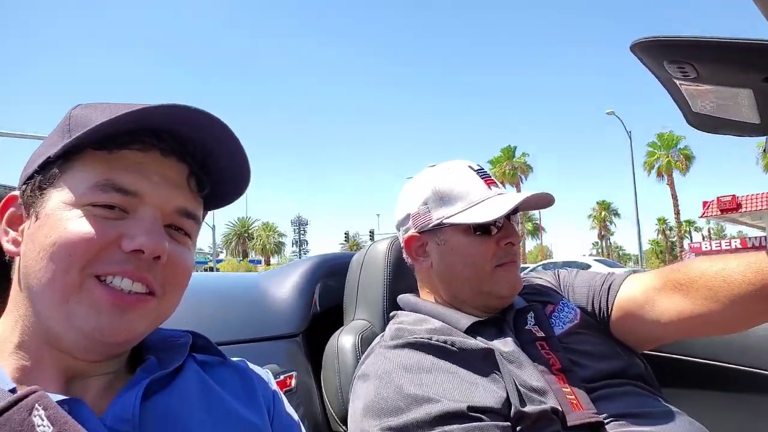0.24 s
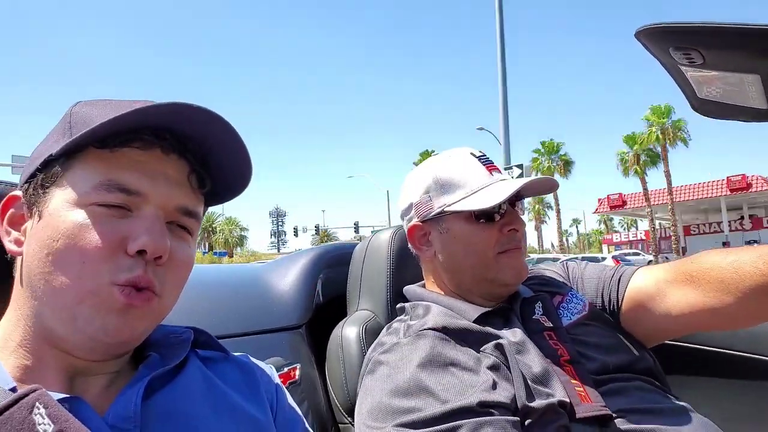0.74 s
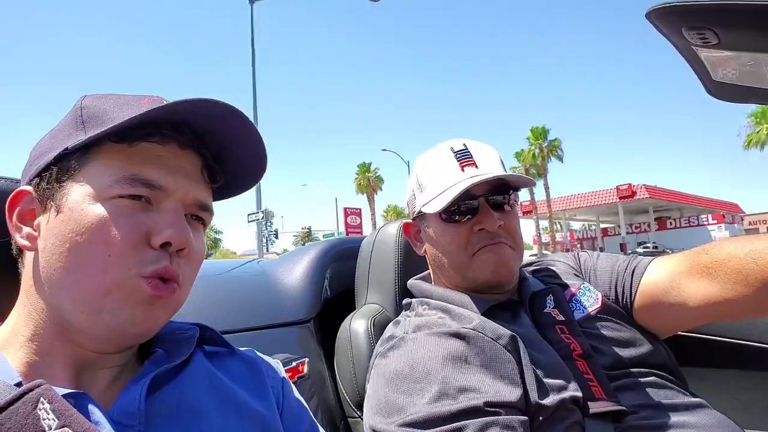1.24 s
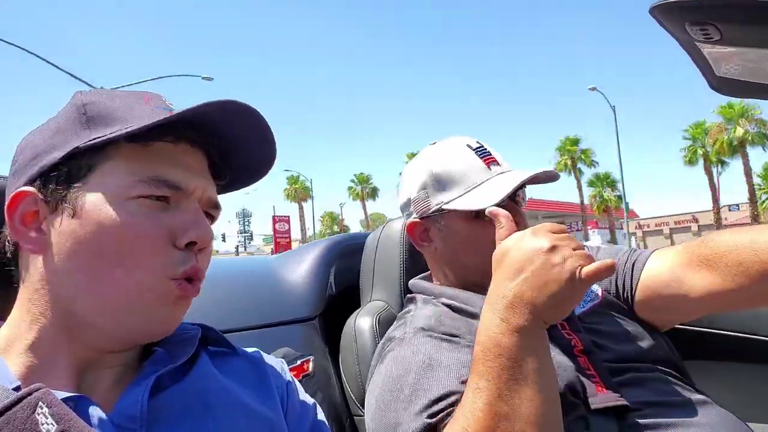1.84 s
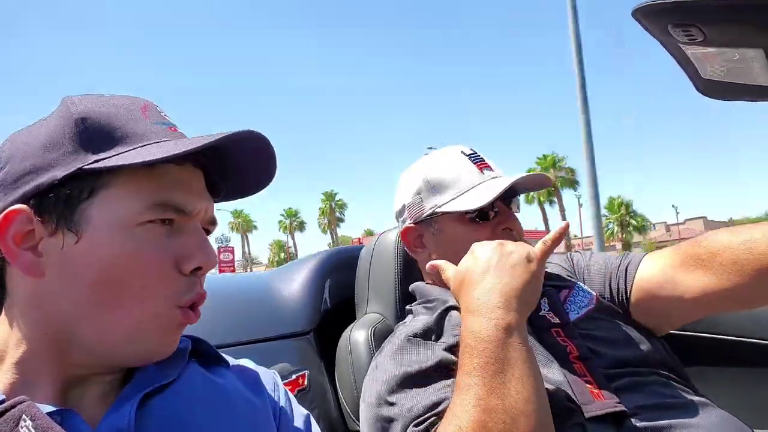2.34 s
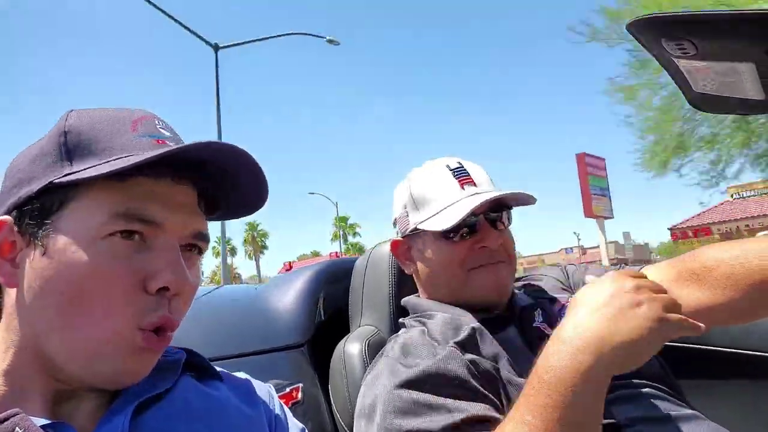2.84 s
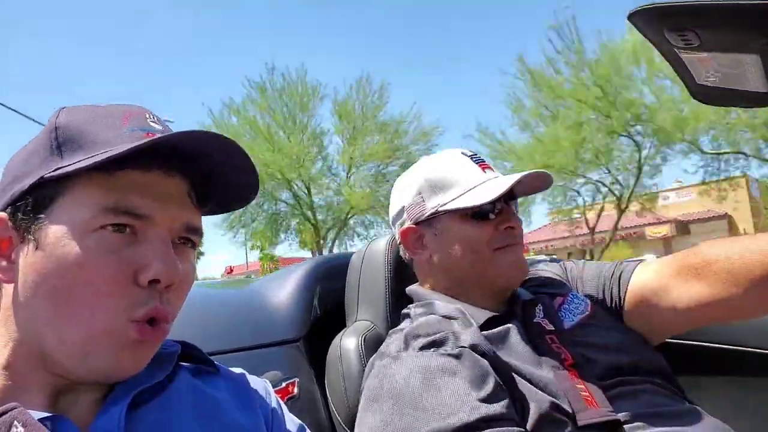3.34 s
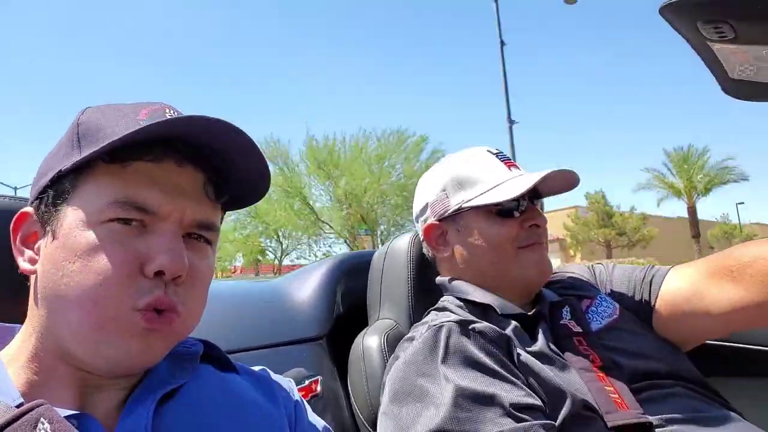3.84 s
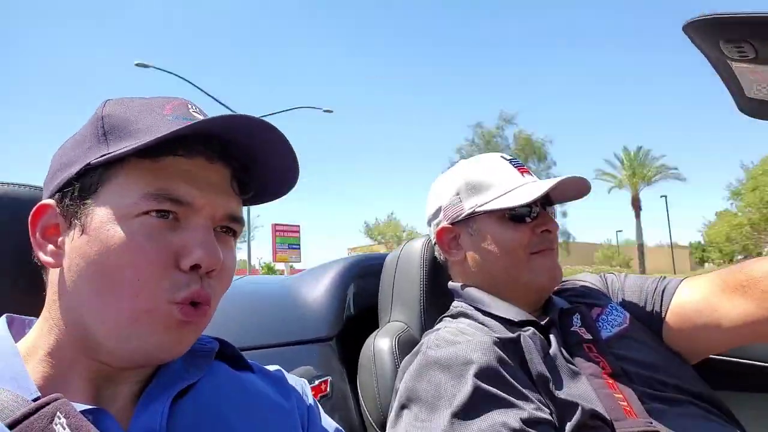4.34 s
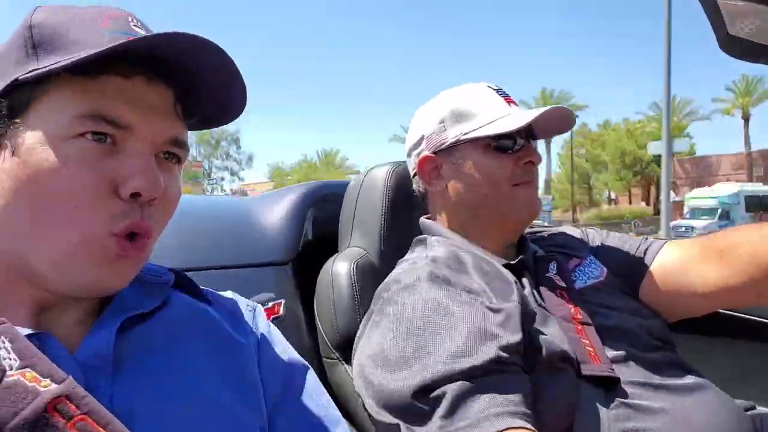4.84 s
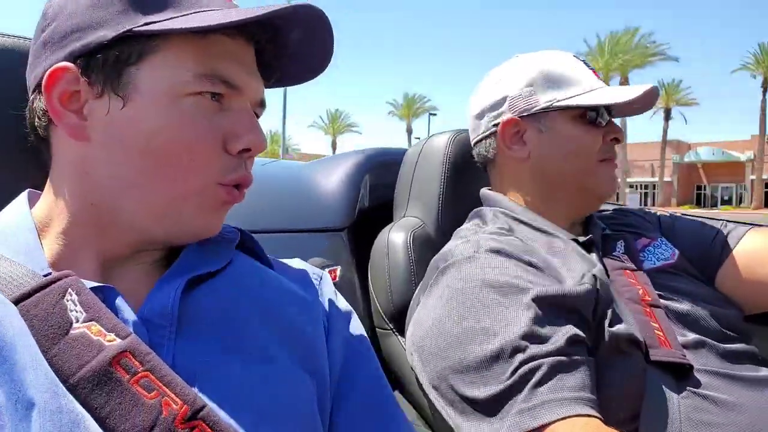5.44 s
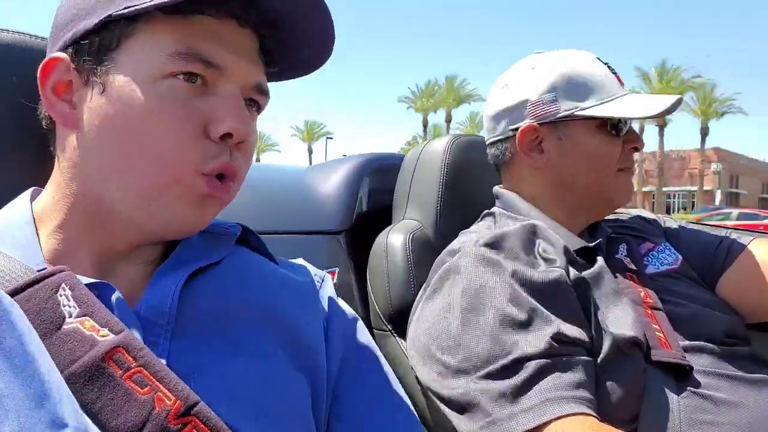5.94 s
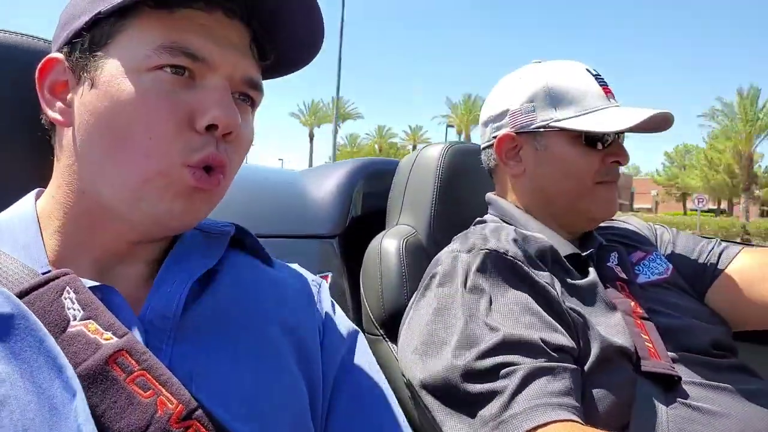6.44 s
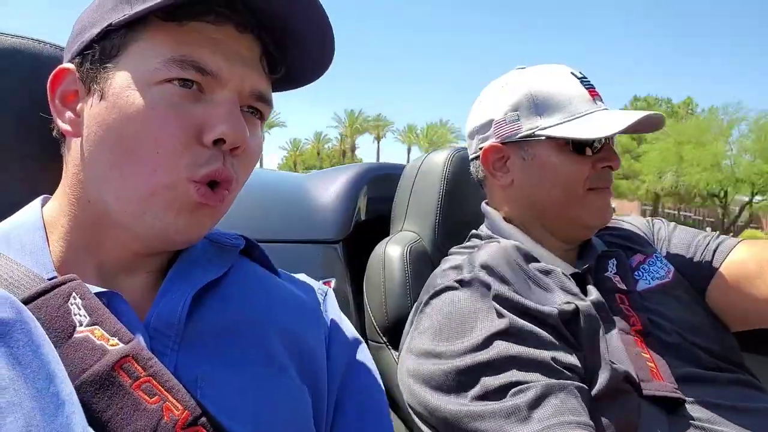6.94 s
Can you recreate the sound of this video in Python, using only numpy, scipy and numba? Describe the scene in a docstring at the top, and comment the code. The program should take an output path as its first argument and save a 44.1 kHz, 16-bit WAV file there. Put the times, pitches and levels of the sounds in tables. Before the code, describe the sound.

Close stereo sound from the cabin of an open convertible. From 0 s a V8 exhaust hums and growls at moderate revs, with road rumble and rushing air; wind gusts thud against the left microphone, busiest from 0.3 to 1.4 s. The pitch climbs smoothly in one gear, and from about 2.5 s the boom and raspy snarl grow much stronger, peaking around 3 to 4.2 s with a brief swell of hiss near 3.65 s. Deep thumps land near 2.9, 3.8 and 4.3 s. At 4.25 s the throttle shuts: the rasp drops, a burble dies away and pitch falls until about 5.7 s. Hard slaps and cracks cluster at 4.3-4.5 and 5-5.25 s. Then the left abruptly turns thin, with puffs, crackles and splutter growing toward 7 s. The right keeps a soft coasting hum, which sinks at the end; hollow knocks fall around 5.5-6.4 s.

```python
"""The exhaust of a V8 convertible sings on every half order of its crankshaft and snarls as it pulls in one gear.
The driver lifts off near the end of the pull and the car coasts, with a dying burble and then a soft hum.
With the roof down, air rushes over the cabin as coloured noise, under a few hollow knocks and deep thumps.
Wind buffets and slaps the left microphone, whose sound turns thin and spluttery near the end.
The right one hears the same wind only faintly."""
import sys
import numpy as np
from scipy import signal
from scipy.fft import rfft, irfft, next_fast_len
from scipy.io import wavfile
from numba import njit

SR = 44100
rng = np.random.default_rng(int(sys.argv[2]) if len(sys.argv) > 2 else 0)


def to_wav(sig):
    """Store sig (one row per channel, or 1-D mono) as 16-bit WAV at the path in sys.argv[1].

    Samples outside -1..1 are clipped; the rate is SR.
    """
    pcm = np.clip(np.atleast_2d(sig), -1, 1) * 32767
    pcm = np.round(pcm).astype(np.int16)
    wavfile.write(sys.argv[1], SR, pcm.T)  # frames by channels


N = 317386

# crankshaft speed through the pull and the coasting: (time [s], speed [turns/s])
CRANK_SPEED = [(0.0, 47.2), (0.8, 56.1), (1.2, 61), (1.6, 66.6), (2.0, 71.6), (2.4, 76.7), (2.7, 80.85),
               (2.9, 83), (3.15, 85.1), (3.35, 88.3), (3.6, 91.25), (3.9, 94.2), (4.1, 96.1), (4.3, 97.5),
               (4.42, 92), (4.6, 93), (5.0, 79), (5.3, 67.5), (5.6, 60), (5.8, 58.5), (6.5, 58), (6.75, 57),
               (7.2, 50.3)]
# engine load: (time [s], relative boom of the low orders [dB], relative roar [dB])
ENGINE_LOAD = [(0.0, -34, -45), (0.7, -34, -45.5), (1.3, -32.5, -43.5), (1.8, -28, -37), (2.3, -28, -36.5),
               (2.55, -23.5, -33), (2.95, -21, -27.5), (3.2, -22, -29), (3.72, -20.5, -26),
               (3.88, -26, -29.5), (4.2, -26, -26), (4.45, -33, -33.5), (5.2, -41, -35), (5.6, -42.5, -32),
               (6.7, -42, -52), (7.2, -49, -59)]
# resonances of pipes and cabin on the way to each ear: (frequency [Hz], left gain [dB], right gain [dB])
PATH_TO_EARS = [(48.0, 1.0, -1.0), (75.0, 3.0, 1.5), (111.0, 7.5, 3.0), (133.0, -1.0, 0.5),
                (154.0, 5.0, 7.0), (175.0, -1.0, 1.0), (200.0, 0.5, -0.5), (227.0, -0.5, -2.0),
                (250.0, -8.5, -4.0), (275.0, -8.0, -9.5), (312.0, -7.0, -15.5), (340.0, -2.0, -9.0),
                (375.0, -3.5, -12.5), (414.0, -8.5, -8.0), (450.0, -2.5, -9.5), (490.0, 0.5, -2.0),
                (530.0, -8.0, -6.5), (580.0, -3.5, -9.0), (630.0, -5.0, -14.0), (690.0, -3.0, -7.5),
                (740.0, -1.0, -5.5), (780.0, 3.5, -5.5), (830.0, 2.0, -9.0), (880.0, -1.5, -10.5),
                (940.0, -1.0, -11.0), (1000.0, -1.0, -8.5), (1060.0, -2.0, -15.5), (1110.0, -8.5, -15.0),
                (1170.0, -2.0, -9.5), (1230.0, -1.5, -11.0), (1300.0, -2.0, -12.0), (1370.0, -3.0, -8.5),
                (1450.0, -6.5, -13.5), (1550.0, -5.0, -20.0), (1680.0, -3.5, -18.0), (1800.0, -9.5, -20.5)]
# road and air noise in the cabin: (time [s], relative rumble [dB], relative rush [dB], relative hiss [dB])
CABIN_AIR = [(0.0, -26, -44.5, -82), (0.7, -33.5, -39.5, -63), (1.25, -37, -44, -78),
             (1.85, -30, -36, -62.5), (4.4, -23.5, -36, -57.5), (5.6, -30, -37.5, -58),
             (6.3, -32, -31.5, -58.5), (6.9, -23.5, -29, -54.5), (7.2, -20, -26, -53)]
# spectrum of the wind's crackles, rustle and fine hiss: (frequency [Hz], relative level [dB])
CRACKLE_SPECTRUM = [(200, -25), (600, 10), (1100, 10), (2000, -1), (3200, -8.5), (5000, -22), (8000, -39),
                    (14000, -37)]
# spectrum of the wind's hollow puffs: (frequency [Hz], relative level [dB])
PUFF_SPECTRUM = [(150, -48), (300, 9), (450, 9.5), (700, -2.5), (1100, -5), (2000, -23.5), (3200, -23.5),
                 (5000, -35.5), (8000, -43), (14000, -41)]

LEFT_LEAD_S = 0.0003  # sound shared by both sides reaches the left first
FIRINGS_PER_TURN = 4
LIFT_OFF_S, CLOSING_S = 4.25, 0.065  # the throttle shuts once
THIN_S, THINNING_S = 5.245, 0.017  # the left side suddenly turns thin


def exhaust(speed, turns, low_rough=0.06, high_rough=0.3, boom_hz=220, rasp_hz=600, uneven_db=1.25):
    """The firing pattern repeats every two turns, so lines stand on half orders; the high ones flutter more."""
    # uneven firing of the two banks:
    # (multiple of crank speed, relative level at low revs [dB], relative level at high revs [dB])
    firing_orders = [(1.0, 12.5, 0.5), (1.5, 2.5, -0.5), (2.0, 1.5, 3.5), (2.5, -1.0, 6.5), (3.0, 5.5, 2.0),
                     (3.5, 6.0, 5.0), (4.0, 19.0, 8.0), (4.5, -3.0, -2.0), (5.0, 5.0, 5.0),
                     (5.5, 2.0, -5.0), (6.0, -2.0, 4.5), (6.5, 2.0, -0.5), (7.0, 4.0, -3.0),
                     (7.5, 0.5, -3.5), (8.0, 9.0, 3.0)]
    # the singing upper orders: (multiple of crank speed, relative level [dB])
    upper_orders = [(8.5, 3.0), (9.0, -0.5), (9.5, -1.0), (10.0, 3.5), (10.5, 2.0), (11.0, 1.5),
                    (11.5, -0.5), (12.0, 1.0), (12.5, -5.5), (13.0, -5.5), (13.5, -3.5), (14.0, 0.0),
                    (14.5, 1.0), (15.0, -3.5), (15.5, 0.0), (16.0, 0.0), (16.5, -1.5), (17.0, -4.5),
                    (17.5, -2.0), (18.0, -4.5), (18.5, -3.5), (19.0, -5.0), (19.5, -4.5), (20.0, -4.5),
                    (20.5, -5.5), (21.0, -7.5)]
    low_revs, high_revs = 55, 87.4  # turns per s

    out = np.zeros((2, N))
    coarse = np.arange(0, N, 64)  # levels move slowly enough for every 64th sample
    boom_db = in_time(ENGINE_LOAD)[0][coarse]
    rasp_db = rasp_level()[coarse]
    revved = np.clip((speed[coarse] - low_revs) / (high_revs - low_revs), 0, 1)
    orders = [(multiple, slow_db + revved * (fast_db - slow_db))
              for multiple, slow_db, fast_db in firing_orders]
    stroke_db = uneven_db * drift(40)[coarse]  # the boom varies quickly in strength

    for multiple, own_db in orders + list(upper_orders):
        hz = multiple * speed[coarse]
        high = np.clip(np.log(hz / boom_hz) / np.log(rasp_hz / boom_hz), 0, 1)
        level_db = own_db + (1 - high) * (boom_db + stroke_db) + high * rasp_db
        rough = low_rough + (high_rough - low_rough) * high.mean()
        swell = 1 + rough * drift(9.0)
        # the lowest orders add up to one beat a cycle; the pipes scatter the others
        scatter = rng.random() * (multiple > 2.5)
        phase = 2 * np.pi * (multiple * turns + scatter) + rough * drift(0.97)
        for side in range(2):
            path_db = at_hz(PATH_TO_EARS, hz, channels=side + 1)
            gain = np.interp(np.arange(N), coarse, from_db(level_db + path_db))
            lag = 2 * np.pi * multiple * speed * LEFT_LEAD_S * side
            out[side] += gain * swell * np.sin(lag - phase)
    return out


def rasp_level(offset_db=-3.5, revs_db=-0.1863, pivot=82.8, shut_loss_db=21):
    """High orders in dB: they follow the roar, ease down as the revs rise, and drop as the throttle shuts."""
    easing_db = revs_db * (in_time(CRANK_SPEED)[0] - pivot)  # dB per turn/s, about a pivot in turns/s
    roar_db = in_time(ENGINE_LOAD)[1]
    return roar_db + offset_db + easing_db - shut_loss_db * ramp(LIFT_OFF_S, CLOSING_S)


def snarl(turns, level_db=-5.5, right_db=-12.5, firing=0.62, flutter_db=2.5, count=420, size=8192):
    """Gas tears through the valves in one ragged pattern every cycle: a dense comb of high lines."""
    # spectrum of the valve snarl: (frequency [Hz], relative level [dB])
    snarl_spectrum = [(1000, -18.5), (1400, 2), (1800, 4), (2600, -8), (3300, -13), (4800, -26.5),
                      (5600, -30.5), (6150, -33.5), (7200, -27), (9500, -59), (12500, -25.5),
                      (14500, -32.5)]
    cycle = irfft(rng.standard_normal(count) + 1j * rng.standard_normal(count), size)
    ragged = np.interp(turns / 2, np.arange(size) / size, cycle, period=1)
    throb = 1 + firing * np.cos(2 * np.pi * FIRINGS_PER_TURN * turns)
    level = from_db(rasp_level() + level_db + flutter_db * drift(8.1))
    return from_db([[0], [right_db]]) * level * colour(ragged * throb, snarl_spectrum)


def drone(speed, turns, rough=0.19, hum_order=3, hum_db=-24.5, burble_order=1.5, burble_db=-11.5):
    """With the throttle shut a burble dies away; later a soft order swells as it sinks into a cabin resonance."""
    coasting_s = np.maximum(np.arange(N) / SR - LIFT_OFF_S, 0)
    resonance_db = at_hz(PATH_TO_EARS, hum_order * speed, channels=2)
    hum = ramp(5.69, 1) * from_db(hum_db + resonance_db)
    fading = from_db(burble_db - 30 * coasting_s)  # fades at 30 dB per s
    burble = ramp(LIFT_OFF_S + CLOSING_S, CLOSING_S) * fading
    out = 0
    for multiple, gain in [(hum_order, hum), (burble_order, burble)]:
        swell = 1 + rough * drift(3.1)
        out = out + gain * swell * np.sin(2 * np.pi * multiple * turns + rough * drift(4.0))
    return out


def buffeting(lumpy_db=5.0, spiky_db=7.5, breeze_db=-25.5):
    """Turbulence comes in lumps, each made of sudden pressure steps."""
    # spectrum of the eddies: (frequency [Hz], relative level [dB])
    eddy_spectrum = [(20, -41), (35, -18), (60, 5), (120, -3), (250, -8), (500, -15.5), (1000, -29.5),
                     (2000, -42), (4000, -73), (8000, -84)]
    uneven_db = lumpy_db * np.tanh(drift(13)) + spiky_db * np.clip(drift(640), -2, 2)
    steps = rng.standard_normal(N) * from_db(uneven_db)
    return (from_db(breeze_db) + gust_strength()) * colour(steps, eddy_spectrum)


def gust_strength(attack_s=0.013, release_s=0.023):
    """Each gust on the left microphone rises, holds and dies away."""
    # gusts: (start [s], length [s], level [dB])
    gust_rows = [(0.33, 0.22, -13.5), (0.541, 0.26, -12), (1.297, 0.17, -14.5), (2.145, 0.033, -8),
                 (3.223, 0.055, -15), (3.757, 0.094, -10.5), (4.27, 0.22, -15), (4.808, 0.032, -15.5),
                 (5.019, 0.202, -10.5), (5.465, 0.37, -38), (6.92, 0.5, -27.5)]
    out = 0
    for start_s, length_s, db in gust_rows:
        rise = ramp(start_s, attack_s)
        out = out + from_db(db) * (rise - rise * ramp(start_s + length_s, release_s))
    return out


def slaps(thud_db=-5.5, spike_db=2.0, recoil_db=0.0, crack_db=0.5, crack_s=0.0021, rise_s=0.0019,
          thud_s=0.0044, lead_s=0.002026, spike_s=0.0005, count=500):
    """An eddy hits the microphone port: a spike of pressure and a short crack, with suction and a dull thud."""
    # the largest eddies on the left microphone: (time [s], relative peak [dB], relative crack [dB])
    large_slaps = [(0.034, -9, -48), (0.168, -9.5, -25), (0.345, -8, -29), (0.375, -8, -24),
                   (0.568, -8, -30), (0.643, -3, -32), (0.674, -13, -29), (0.718, -16, -39),
                   (0.734, -6.5, -42), (0.745, -10, -37), (0.788, -5.5, -15), (0.805, -13, -39),
                   (0.951, -15, -44), (1.006, -13, -47), (1.169, -6.5, -20), (1.178, -5, -15),
                   (1.219, -9, -11.5), (1.255, -13, -46), (1.299, -8, -43), (1.325, -18, -36),
                   (1.346, -8.5, -41), (1.373, -19, -36), (1.611, -2, -18), (3.069, 0, -17),
                   (3.3295, -1, -15), (3.858, 0.5, -37), (3.9097, -3, -32), (3.927, -4.5, -25),
                   (4.194, -9, -32), (4.302, -3, -26), (4.307, -13, -29), (4.36, -10, -32), (4.368, -2, -3),
                   (4.377, -0.5, -30), (4.383, -1, -18), (4.401, -13, -19), (4.409, -7, -11),
                   (4.428, -19, -32), (4.48, -8, -24), (4.823, -9, -28), (5.0198, -3.5, -24),
                   (5.023, -13, -28), (5.035, -14, -30), (5.045, -11, -31), (5.056, 0, -13),
                   (5.075, -8, -10.5), (5.083, -7, -32), (5.121, -13, -33), (5.1294, -2.5, -10.5),
                   (5.1372, -2, -3.5), (5.144, -10, -12), (5.186, -13, -27), (5.197, -15, -30),
                   (5.2318, 0.5, -14), (5.251, -12, -20)]
    # what a slap rings with: (frequency before a random stretch [Hz], relative level [dB], decay [s])
    port_rings = [(111, -0.5, 0.004), (330, -11, 0.002), (650, -18, 0.00088), (1020, -18, 0.0012)]
    # spectrum of the thud: (frequency [Hz], relative level [dB])
    thud_spectrum = [(40, 6), (90, 5.5), (300, 4), (600, 3), (1100, -11.5), (2000, -30.5), (5000, -90.5)]
    # spectrum of the crack: (frequency [Hz], relative level [dB])
    crack_spectrum = [(300, -4.5), (1100, 4), (2500, -10.5), (5000, -27.5), (8000, -44), (10000, -49),
                      (14000, -68)]

    out, thud, crack = np.zeros(N), noise(thud_spectrum), noise(crack_spectrum)
    stretches = np.exp(rng.normal(0, 0.11, count))
    for (s, peak_db, bright_db), stretch in zip(list(large_slaps) + small_slaps(), stretches):
        at = np.arange(int(s * SR), min(int((s + .06) * SR), N))
        t = (at - at[0]) / SR
        after = np.maximum(t - lead_s, 0)  # the spike starts a little after the thud
        body = thud[at] * (1 - np.exp(-t / rise_s)) * np.exp(-t / thud_s)
        body = 2 * body / (np.abs(body).max() + 1e-20)
        spike = (after / spike_s * np.exp(1 - after / spike_s)) ** 3  # reaches its top after spike_s
        recoil = np.zeros(len(t))
        for k, (hz, db, decay) in enumerate(port_rings):
            ring = np.sin(2 * np.pi * hz * stretch * after) * np.exp(-after / decay)
            recoil += (-1) ** (k + 1) * from_db(db) * ring
        pressure = from_db(thud_db) * body + from_db(spike_db) * spike + from_db(recoil_db) * recoil
        out[at] += from_db(peak_db) * pressure
        crack_shape = np.minimum(t / lead_s, 1) ** 2 * np.exp(-after / crack_s)
        out[at] += from_db(bright_db + crack_db) * crack[at] * crack_shape
    return signal.sosfilt(signal.butter(2, 5500, fs=SR, output="sos"), out)


def small_slaps(per_s=26, peak_db=-10, crack_db=-26, spread_db=3.0, count=400):
    """Smaller slaps inside the gusts, unevenly spaced, at a random level relative to the gust."""
    draws, gust = rng.random((count, 2)), gust_strength()
    times = np.cumsum(.5 + draws[:, 0]) / per_s
    rows = []
    for s, size in zip(times, 2 * draws[:, 1] - 1):
        if s * SR < N and gust[int(s * SR)] > 0:
            db = 20 * np.log10(gust[int(s * SR)]) + spread_db * size
            rows.append((s, db + peak_db, db + crack_db))
    return rows


def sputters(puff_db=-0.5, crackle_db=5.0, puff_s=0.007, crackle_s=0.0019):
    """Each larger eddy on the thin left side is a hollow puff with a shorter crackle at its height."""
    # sputters: (time [s], relative puff [dB], relative crackle [dB])
    sputter_rows = [(5.281, -26, -24), (5.329, -24, -29), (5.378, -24, -31), (5.402, -21, -31),
                    (5.43, -26, -30), (5.48, -24, -29), (5.505, -24, -30), (5.522, -24, -28),
                    (5.569, -24, -34), (5.662, -22, -29), (5.734, -21, -31), (5.766, -23, -29),
                    (5.839, -23, -31), (5.882, -24, -36), (5.943, -22, -29), (5.965, -22, -31),
                    (5.999, -22, -31), (6.019, -26, -27), (6.069, -23, -29), (6.163, -25, -29),
                    (6.187, -20, -29), (6.207, -17, -32), (6.247, -21, -29), (6.275, -22, -34),
                    (6.303, -19, -30), (6.322, -30, -27), (6.387, -24, -33), (6.42, -23, -31),
                    (6.514, -22, -29), (6.56, -20, -30), (6.602, -20, -26), (6.647, -21, -35),
                    (6.705, -22, -33), (6.738, -19, -28), (6.768, -15, -24), (6.819, -18, -26),
                    (6.86, -15, -21), (6.889, -19, -20), (6.907, -19, -37), (6.96, -19, -22),
                    (6.994, -20, -21), (7.017, -14, -23), (7.047, -15, -20), (7.074, -16, -27)]
    t, puff, crackle = np.arange(N) / SR, np.zeros(N), np.zeros(N)
    for s, low_db, high_db in sputter_rows:
        near = slice(int((s - .04) * SR), int((s + .04) * SR))
        puff[near] += from_db(low_db + puff_db) * np.exp(-((t[near] - s) / puff_s) ** 2)
        crackle[near] += from_db(high_db + crackle_db) * np.exp(-np.abs(t[near] - s) / crackle_s)
    return puff * noise(PUFF_SPECTRUM) + crackle * noise(CRACKLE_SPECTRUM)


def splutter(per_s=260, size_db=2.0, tick_s=0.00041, level_db=0.0, rustle_db=-8.5, hiss_db=-13.0):
    """Small eddies make an uneven run of rustling puffs over a smooth hiss, following the rush of air."""
    sizes = from_db(size_db * np.minimum(rng.exponential(1, N), 2))
    hits = (rng.random(N) < per_s / SR) * sizes
    keep = np.exp(-1 / (tick_s * SR))
    # each hit swells and dies in a moment
    envelope = rms_one(signal.lfilter([1], [1, -2 * keep, keep ** 2], hits + 1e-18))
    puffs = from_db(level_db) * noise(PUFF_SPECTRUM) + from_db(rustle_db) * noise(CRACKLE_SPECTRUM)
    hiss = from_db(hiss_db) * noise(CRACKLE_SPECTRUM)
    return ramp(THIN_S, THINNING_S) * from_db(in_time(CABIN_AIR)[1]) * (envelope * puffs + hiss)


def rush(turns, firing=0.038, lope=0.076, rumble_db=5.5, left_db=5.5, right_db=-7, lumpy_db=2.5, beat=0.17):
    """Rumble, roar and hiss of road, air and engine; the firings throb in it while the throttle is open."""
    # spectrum of the low rumble: (frequency [Hz], relative level [dB])
    rumble_spectrum = [(20, -33), (32, -8), (55, -1.5), (85, -3.5), (130, -7), (230, -13.5), (330, -22),
                       (500, -23), (1000, -42.5), (3000, -83.5)]
    # spectrum of the roar: (frequency [Hz], relative level [dB])
    roar_spectrum = [(150, -29), (300, 6.5), (500, 0), (680, -3), (1000, 5), (1400, -0.5), (2000, -4.5),
                     (3200, -13), (5000, -22), (6500, -27.5), (8000, -53), (14000, -41.5)]
    # spectrum of the hiss: (frequency [Hz], relative level [dB])
    hiss_spectrum = [(2500, 2.5), (5400, 3.5), (6150, 2.5), (7000, 2.5), (8000, -0.5), (9500, 4),
                     (12500, 2.5), (14500, -3.5)]

    air_rumble_db, air_roar_db, air_hiss_db = in_time(CABIN_AIR)
    engine_db = in_time(ENGINE_LOAD)[1]
    throttle = 1 - ramp(LIFT_OFF_S, CLOSING_S)

    roar_db = 20 * np.log10(np.hypot(from_db(air_roar_db), from_db(engine_db)))
    firings = firing * np.cos(2 * np.pi * FIRINGS_PER_TURN * turns)
    throb = 1 + throttle * (firings + lope * np.cos(2 * np.pi * turns))
    roar = from_db([roar_db + left_db, roar_db + right_db]) * stereo_noise(roar_spectrum, alike=0.21) * throb

    shake = 1 + throttle * beat * np.cos(np.pi * turns)  # the body shakes once a cycle
    low_level = from_db(air_rumble_db + rumble_db + lumpy_db * drift(10))
    low = low_level * stereo_noise(rumble_spectrum, alike=0.68) * shake

    # the engine's hiss grows faster than its roar, and all the hiss swells once near the top of the pull
    hiss_level = np.hypot(from_db(air_hiss_db), from_db(-9.5 + 1.625 * engine_db))
    swish_db = 7.5 * np.exp(-((np.arange(N) / SR - 3.65) / 0.16) ** 2)
    hiss = hiss_level * from_db(swish_db) * stereo_noise(hiss_spectrum, alike=0.043)
    return low + roar + hiss


def knocks(left_db=3.0, knock_s=0.0068):
    """Each knock in the cabin is a short burst of hollow noise that swells and dies as the car coasts."""
    # knocks: (time [s], relative level [dB])
    knock_rows = [(5.525, -31), (5.669, -32), (6.205, -23), (6.374, -32)]
    # spectrum of a knock: (frequency [Hz], relative level [dB])
    knock_spectrum = [(200, -23), (350, -2), (430, -4), (550, -11), (900, -19), (4000, -74)]
    t, envelope = np.arange(N) / SR, np.zeros(N)
    for s, db in knock_rows:
        age = np.maximum(t - s, 0) / knock_s
        envelope += from_db(db) * age * np.exp(1 - age)
    return from_db([[left_db], [0]]) * envelope * noise(knock_spectrum)


def thumps(hz=69, width_s=0.028):
    """Each deep thump in the cabin is a few slow swings of pressure that swell and fade."""
    # thumps: (time [s], level [dB])
    thump_rows = [(0.588, -20), (2.9, -11), (3.771, -12.5), (4.27, -11)]
    t, out = np.arange(N) / SR, np.zeros(N)
    for s, db in thump_rows:
        out += from_db(db) * np.exp(-((t - s) / width_s) ** 2) * np.sin(2 * np.pi * hz * (t - s))
    return out


def from_db(db):
    """Decibels to gain."""
    return 10 ** (np.asarray(db) / 20)


def rms_one(x):
    """Scale to unit power."""
    return x / np.sqrt(np.mean(x ** 2) + 1e-20)


def in_time(rows):
    """Each column of a curve at every sample."""
    s, *columns = np.transpose(rows)
    return [np.interp(np.arange(N) / SR, s, c) for c in columns]


def at_hz(points, hz, channels=1):
    """Read one column of a spectrum on a log-frequency axis."""
    points = np.array(points)
    return np.interp(np.log(hz), np.log(points[:, 0]), points[:, channels])


def ramp(start_s, length_s):
    """Rise from 0 to 1 and stay there."""
    return np.clip((np.arange(N) / SR - start_s) / max(length_s, 1 / SR), 0, 1)


def drift(rate):
    """Smooth random wander of unit rms, faster for a higher rate in Hz; drawn at every 40th sample."""
    r = np.exp(-80 * np.pi * rate / SR)
    slow = signal.lfilter([1], [1, -2 * r, r * r], rng.standard_normal(N // 40 + 2002))
    slow = slow[2000:]  # skip the filter's start
    return np.interp(np.arange(N) / 40, np.arange(len(slow)), rms_one(slow))


def colour(x, spectrum):
    """Give a sound a spectrum; rms 1."""
    size = next_fast_len(N)
    hz = np.maximum(np.arange(size // 2 + 1) * SR / size, 1)
    return rms_one(irfft(rfft(x, size) * from_db(at_hz(spectrum, hz)), size)[:N])


def noise(spectrum):
    """Coloured noise; rms 1."""
    return colour(rng.standard_normal(N), spectrum)


def stereo_noise(spectrum, alike):
    """Noise partly shared by both sides; the shared part reaches the left first."""
    share, shared = np.clip(alike, 0, 1), noise(spectrum)
    late = np.interp(np.arange(N) - LEFT_LEAD_S * SR, np.arange(N), shared)
    own = np.array([noise(spectrum), noise(spectrum)])
    return np.sqrt(share) * np.array([shared, late]) + np.sqrt(1 - share) * own


def scene(wobble=0.00079, lee_db=-26, thin_loss_db=17):
    """Car on both sides, quieter on the left once it turns thin; the wind barely reaches the right."""
    speed = in_time(CRANK_SPEED)[0] * (1 + wobble * drift(7.6))
    turns = np.cumsum(speed) / SR
    left, right = exhaust(speed, turns) + snarl(turns) + drone(speed, turns) + rush(turns)
    wind = buffeting() + slaps() + splutter() + sputters()
    left = left * from_db(-thin_loss_db * ramp(THIN_S, THINNING_S)) + wind
    right = right + from_db(lee_db) * wind
    return np.array([left, right]) + knocks() + thumps()


@njit
def high_pass(x, step):
    """Two-pole high-pass with a moving corner (radians per sample)."""
    out, low, band = np.zeros(len(x)), 0.0, 0.0
    for i in range(len(x)):
        low += step[i] * band
        out[i] = x[i] - low - np.sqrt(2) * band
        band += step[i] * out[i]
    return out


def limiter(x, top_db=0.0, release_db_per_s=70, attack_s=0.0023):
    """A peak over the top pushes both sides down within a few milliseconds; the gain then creeps back."""
    over = np.maximum(20 * np.log10(np.abs(x).max(axis=0) + 1e-20) - top_db, 0)
    recovered = release_db_per_s * np.arange(N) / SR
    cut_db = np.maximum.accumulate(over + recovered) - recovered
    keep = np.exp(-1 / (attack_s * SR))
    return x * from_db(-signal.lfilter([1 - keep], [1, -keep], cut_db))


def record(dry, cutoff_hz=14650):
    """The left microphone loses bass, the largest peaks duck the level, peaks are rounded, the top is cut."""
    # moving low corner of the left microphone: (time [s], corner of each of two passes [Hz])
    bass_corner = [(5.245, 19), (5.27, 290), (5.43, 170), (5.5, 89), (5.88, 77), (6.0, 276), (6.6, 185),
                   (7.15, 65)]
    step = 2 * np.pi * np.clip(in_time(bass_corner)[0], 1, 2000) / SR
    left = high_pass(high_pass(dry[0], step), step)
    both = limiter(np.array([left, dry[1]]))
    rounded = both / (1 + both ** 6) ** (1 / 6)
    top_cut = signal.cheby2(16, 70, cutoff_hz + 500, fs=SR, output="sos")
    return signal.sosfilt(top_cut, rounded)


dry = scene()
out = record(dry)
to_wav(out)
```